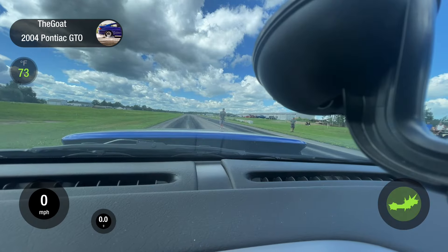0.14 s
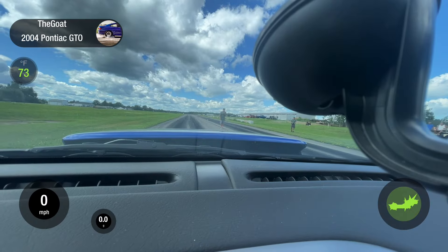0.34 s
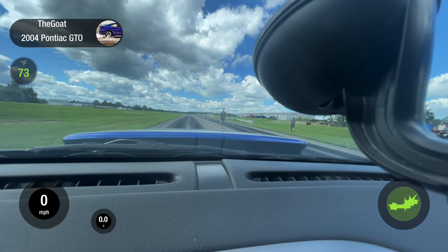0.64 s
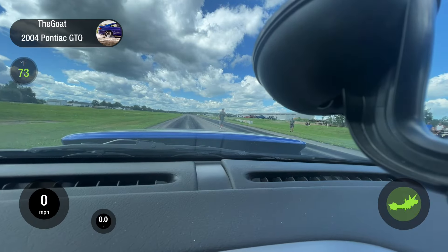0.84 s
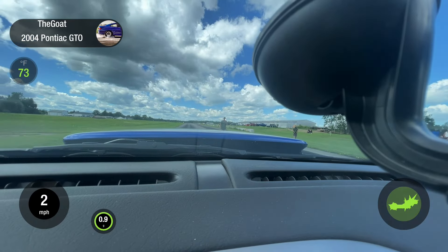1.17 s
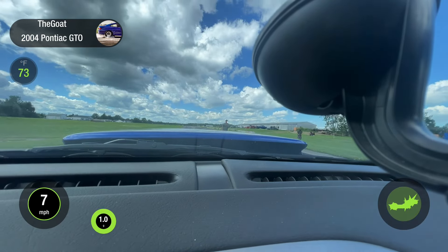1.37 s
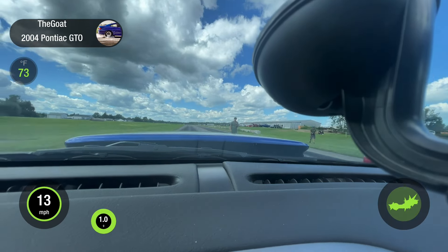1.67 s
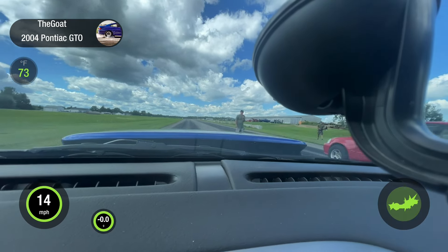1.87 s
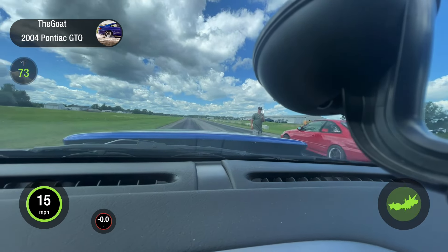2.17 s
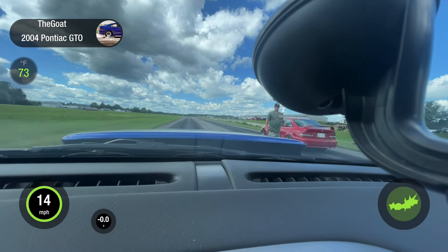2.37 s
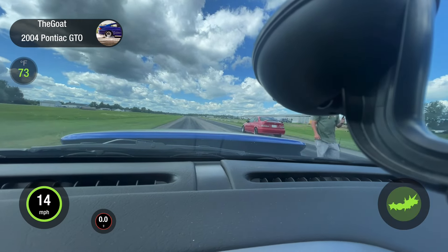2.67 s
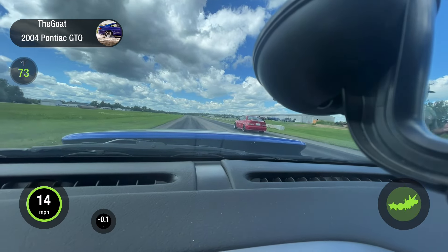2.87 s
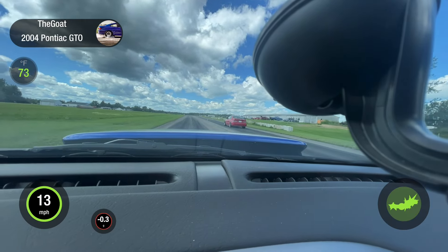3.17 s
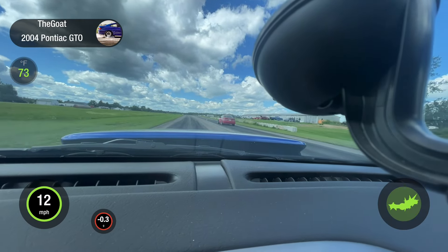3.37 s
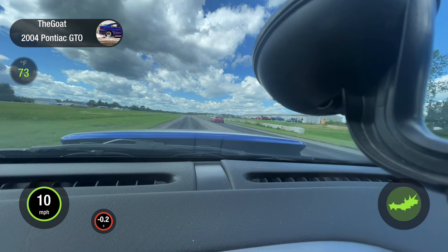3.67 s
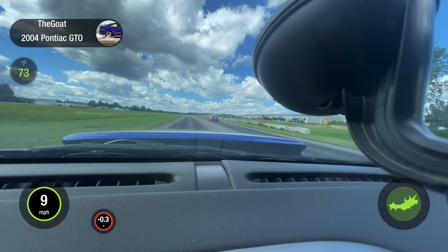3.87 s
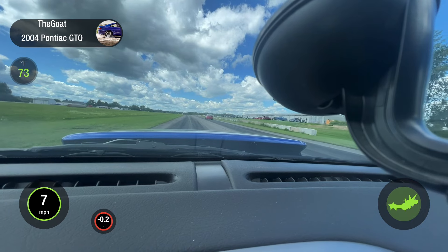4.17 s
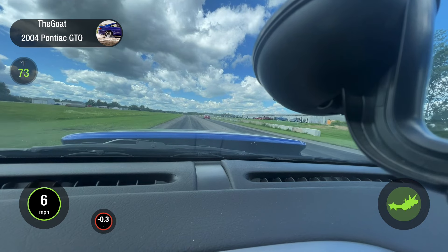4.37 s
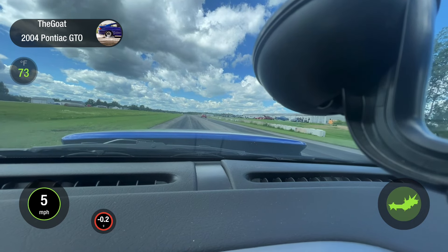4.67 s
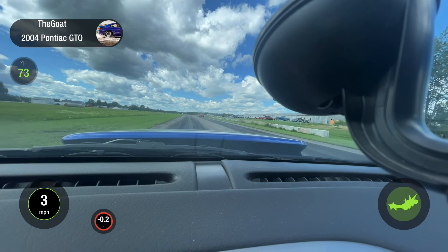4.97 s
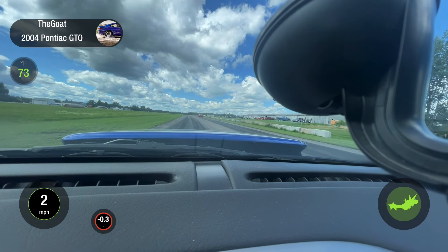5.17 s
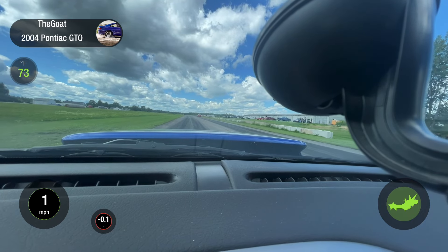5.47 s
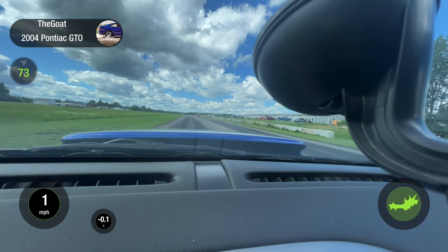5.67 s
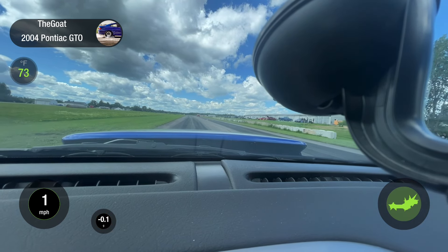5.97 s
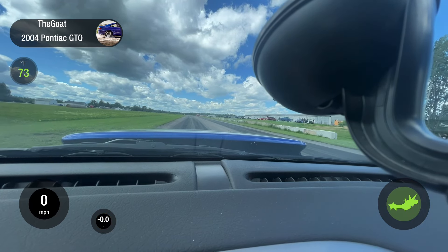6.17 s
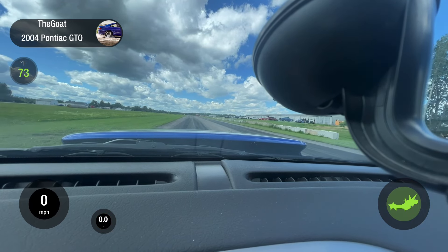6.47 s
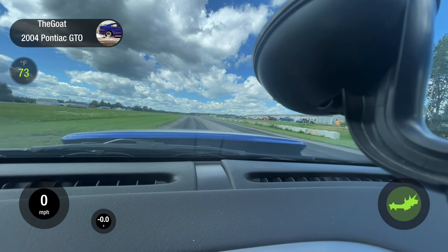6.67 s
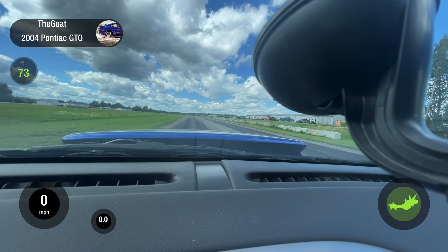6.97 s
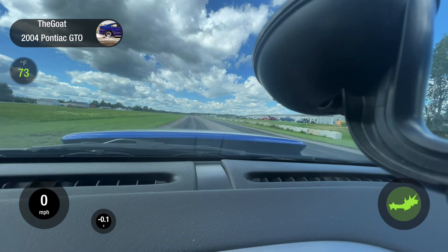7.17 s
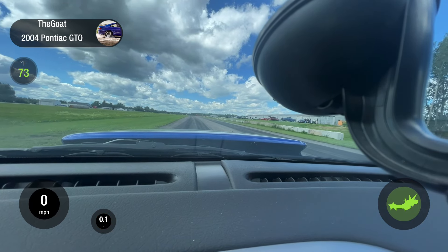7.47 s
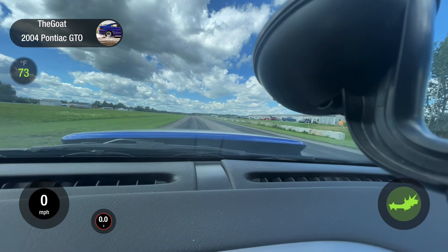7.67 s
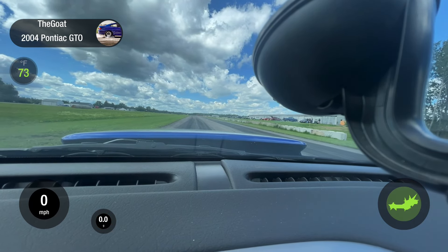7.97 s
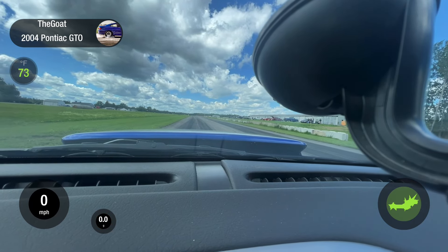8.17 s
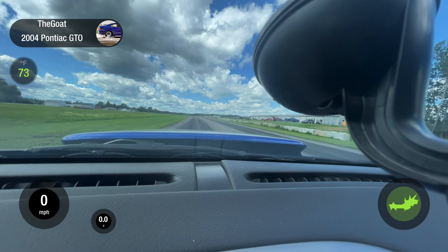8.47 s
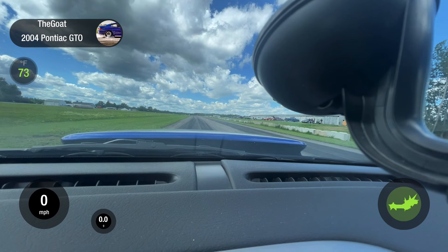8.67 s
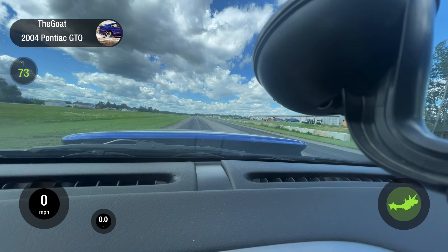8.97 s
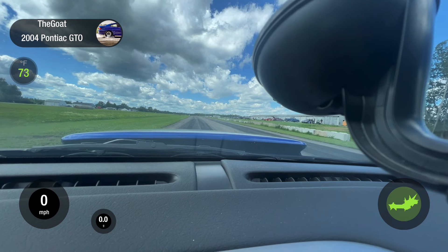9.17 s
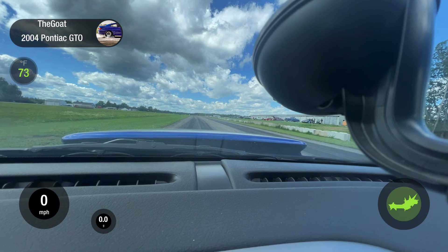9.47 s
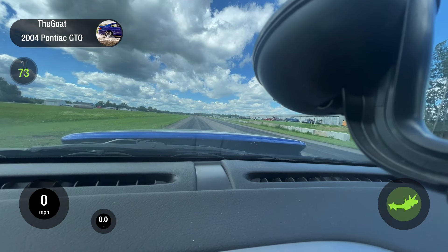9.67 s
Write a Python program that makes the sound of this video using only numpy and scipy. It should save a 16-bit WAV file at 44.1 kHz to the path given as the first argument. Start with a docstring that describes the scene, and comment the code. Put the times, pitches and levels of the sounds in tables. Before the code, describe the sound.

Heard from the dashboard of a muscle car: a lumpy supercharged V8 holds revs while its exhaust pops and crackles. It launches in a short, loud, rising roar with dash rattle, as another car pulls away. The throttle lifts, pitch slides down to a quiet idle, then the engine is revved and held softly with faint blower whine. Lever and latch clicks close it.

```python
"""A supercharged V8 heard from its own cabin, one microphone on the dashboard: it holds its revs while the exhaust
pops, is launched, lifted off, coasts to idle, then is revved and held. Sines follow its firings, noise its gas flow.
The blower whines at a fixed multiple of the firing rate and the dash buzzes more with flow and revs.
Another car pulls away as rising tones with rasp; at the end a hand works a lever and a latch, bursts of ringing
noise. A thin whistle of two fuzzy lines lies under the start. No source is delayed for its distance."""
import sys
import numpy as np
from scipy import signal
from scipy.fft import rfft, irfft, next_fast_len
from scipy.io import wavfile
from scipy.ndimage import uniform_filter1d, minimum_filter1d, map_coordinates

SR = 44100
rng = np.random.default_rng(int(sys.argv[2]) if len(sys.argv) > 2 else 0)


def makeup_ratio(level_db):
    """Linear amplitude ratio for a level in decibels (20 dB per factor of ten)."""
    decades = np.asarray(level_db, float) / 20
    return 10 ** decades


def store_pcm(level_fs):
    """Save levels as 16-bit WAV."""
    pcm = np.round(np.clip(level_fs, -1, 1) * 32767).astype(np.int16)
    wavfile.write(sys.argv[1], SR, np.atleast_2d(pcm).T)


N = 433503


# The engine's state, before flywheel smoothing and resonances:
# (time [s], firing rate [Hz], firing tone [dB], misfire half orders [dB], blower whine [dB])
ENGINE_STATE = [(0, 106.2, -14, -19, -57), (.7, 101.2, -10, -16, -53), (.85, 119.4, -10, -21, -48),
                (.98, 149.3, -7.5, -38, -64), (1.15, 148.3, -9.5, -48, -58), (1.4, 181.9, -1.5, -33, -49),
                (1.56, 216.6, -9, -27, -45.5), (1.65, 238.5, -24, -8, -54), (1.72, 268.3, -49, -34, -52),
                (1.9, 319.4, -36, -21.5, -45), (2.03, 369.7, -36, -21.5, -61),
                (2.25, 328.7, -18.5, -20, -56), (2.45, 294.3, -24.5, -28.5, -59),
                (2.9, 231.3, -26.5, -24, -59.5), (3.33, 170.6, -23, -31.5, -63.5),
                (3.6, 144, -24.5, -27, -60), (3.86, 121.8, -16.5, -35.5, -60.5),
                (4.36, 100.8, -24.5, -35, -59), (4.75, 93.16, -18.5, -37.5, -60.5),
                (5.62, 90.15, -16.5, -24.5, -59), (5.73, 111.4, -11.5, -30, -67),
                (5.83, 142.9, -11, -21, -53), (5.91, 161.9, -16, -31, -46), (5.99, 167, -13, -26.5, -53.5),
                (6.3, 146.2, -32, -17, -50.5), (6.45, 138.5, -13.5, -24, -52.5),
                (7.15, 160.2, -16, -19.5, -49.5), (7.6, 152.5, -15.5, -23.5, -48.5),
                (7.94, 165.2, -15.5, -21.5, -46), (8.25, 144.1, -25, -15.5, -48.5),
                (8.4, 132.5, -11, -20, -55.5), (8.85, 109.3, -18, -24.5, -51.5),
                (9.2, 89.57, -18.5, -24, -50), (9.83, 80.36, -18.5, -24, -58)]
# Gas flow that drives the noises: (time [s], exhaust flow [relative dB], intake flow [relative dB])
GAS_FLOW = [(0, -25.5, -49.5), (.75, -25, -45.5), (.98, -17.5, -37.5), (1.45, -18, -40), (1.6, -11.5, -37),
            (1.7, -26, -41.5), (1.72, -26, -48), (1.77, -31, -52), (1.785, -12.5, -33.5), (1.9, -14, -35),
            (1.94, -25.5, -49.5), (2.3, -28, -48), (3.04, -36, -53.5), (3.3, -40.5, -60),
            (4.2, -44.5, -61.5), (5.66, -43, -59.5), (5.71, -35.5, -51.5), (5.86, -31.5, -49.5),
            (5.92, -35, -54.5), (6.54, -38, -55), (6.92, -34, -53), (8.27, -31.5, -52),
            (8.84, -37.5, -54.5), (9.83, -38, -54)]


def engine():
    """One crank drives it all: eight firings per engine cycle, gas noise, rattling dash and blower."""
    firing_hz, burn_db, misfire_db, whine_db = curves(ENGINE_STATE)
    exhaust_db, intake_db = curves(GAS_FLOW)
    flywheel_s = .09  # the crank's inertia rounds off changes of speed
    firing_hz = uniform_filter1d(firing_hz, round(flywheel_s * SR), mode="nearest")
    firing = 2 * np.pi * np.cumsum(firing_hz) / SR  # phase [rad]
    tones = firing_tones(firing, firing_hz, burn_db, exhaust_db)
    tones += uneven_cylinders(firing, firing_hz, burn_db, misfire_db)
    exhaust = roar(firing, firing_hz, exhaust_db) + rumble(exhaust_db)
    intake = hiss(firing, intake_db) + throttle_jet(firing_hz, intake_db)
    return tones + exhaust + intake + dash_buzz(firing_hz, exhaust_db) + whine(firing, firing_hz, whine_db)


# Pipe modes that pass the octave of the firing tone:
# (centre [Hz], half width [Hz], level over the firing tone at -26.5 dB exhaust flow [dB])
OCTAVE_MODES = [(183, 32, -10), (295.3, 15.2, -8.5), (325, 5.5, -14), (437, 24.7, -13), (493, 35, -9.5),
                (700, 340, -18)]


def firing_tones(firing, firing_hz, burn_db, exhaust_db):
    """The firing rate and its octave and third partial, each let through by cabin or pipe resonances."""
    null_hz, null_width_hz = 207, 13.2  # the cabin swallows the firing tone here
    null = 1 - 1 / (1 + ((firing_hz - null_hz) / null_width_hz) ** 2)
    first = null * tone(firing, burn_db, waver_db=2.0, drift=0.64, rate=14)

    passed = sum(makeup_ratio(db) / (1 + ((2 * firing_hz - hz) / width) ** 4) for hz, width, db in OCTAVE_MODES)
    octave_db = burn_db + 0.37 * (exhaust_db + 26.5)  # 0.37 dB more per dB of flow
    octave = passed * tone(2 * firing, octave_db, waver_db=5.0, drift=0.64, rate=12)

    tailpipe = 1 / (1 + ((3 * firing_hz - 480) / 55) ** 4)  # the third partial sounds only near 480 Hz
    third = tailpipe * tone(3 * firing, 2 * exhaust_db + 18, waver_db=2.5, drift=0.58, rate=5.5)
    return first + octave + third


def uneven_cylinders(firing, firing_hz, burn_db, misfire_db):
    """Unequal cylinders sound the even (crank) and odd (misfire) multiples of the engine cycle."""
    cycle, cycle_hz = firing / 8, firing_hz / 8
    full_load_db = -14.5  # firing tone above which the cylinders even out and crank orders fade
    crank_db = -14.5 + 0.29 * misfire_db - 1.3 * np.maximum(burn_db - full_load_db, 0)
    crank = orders(cycle, cycle_hz, crank_db, waver_db=2.5, drift=0.25, rate=8,
                   order=[2, 4, 6, 10, 12, 14, 18, 20])
    misfire = orders(cycle, cycle_hz, misfire_db, waver_db=3.5, drift=1.3, rate=12, order=range(1, 21, 2))
    return crank + misfire


def orders(cycle, cycle_hz, db, waver_db, drift, rate, order):
    """Multiples of the engine cycle, with the level shared out among them by the cabin boom."""
    shares = np.array([along(CABIN_BOOM, k * cycle_hz) / (1 + (55 / (k * cycle_hz)) ** 4) for k in order])
    shares /= np.sqrt(np.sum(shares ** 2, axis=0))
    return sum(share * tone(k * cycle, db, waver_db, drift, rate) for k, share in zip(order, shares))


# Exhaust roar, also the colour of the other car's rasp: (frequency [Hz], gain before levelling [dB])
ROAR_COLOUR = [(140, -12.5), (230, -6), (252, -10.5), (322, -5.5), (567, -17), (733, -17.5), (1230, -25),
               (1470, -28.5), (3530, -38.5), (5000, -68), (6500, -82.5), (11000, -120)]


def roar(firing, firing_hz, exhaust_db):
    """Gas turbulence follows each blowdown; single firings stand out of it more as their rate rises."""
    puffs = makeup_ratio(0.37 * np.cos(firing) + 1.7 * np.cos(firing / 4) + 1.1 * wobble(30))
    turbulence = puffs * rng.standard_normal(N)
    clean = np.minimum(firing_hz / 260, .75)  # weight of the single firings
    shots = firings(firing + .17 * wobble(40), uneven=1.3, scatter_db=2)
    return makeup_ratio(exhaust_db + 3.5) * rush(ROAR_COLOUR, turbulence + clean * shots)


# Strength of each cylinder in firing order, later scaled by "uneven": (level [dB])
CYLINDER_LEVELS = [0, -6, 3, -2, 2, -7, 4, -3]


def firings(phase, uneven, scatter_db):
    """One click per firing, sized by its cylinder and by chance, levelled to a running rms of 1."""
    count = np.floor(phase / (2 * np.pi)).astype(int)
    at = np.flatnonzero(np.diff(count)) + 1
    cylinder_db = np.take(CYLINDER_LEVELS, count[at] % len(CYLINDER_LEVELS))
    out = np.zeros(N)
    out[at] = makeup_ratio(uneven * cylinder_db + scatter_db * rng.standard_normal(len(at)))
    return out / np.sqrt(uniform_filter1d(out ** 2, SR // 10) + 1e-9)


# Low boom of the cabin, shaping rumble and engine orders: (frequency [Hz], gain before levelling [dB])
CABIN_BOOM = [(20, -0.5), (40, -0.5), (60, 9), (90, 8), (140, 6), (190, 5), (225, -22.5), (300, -14),
              (450, -15.5), (700, -48)]


def rumble(exhaust_db):
    """Low noise in the cabin that grows 0.62 dB per dB of exhaust flow."""
    return makeup_ratio(-9.5 + 0.62 * exhaust_db) * rush(CABIN_BOOM, rng.standard_normal(N))


# Intake hiss: (frequency [Hz], gain before levelling [dB])
HISS_COLOUR = [(1760, -11), (3000, -1.5), (4620, -5), (5460, -9), (7210, -9.5), (9500, -14), (11000, -31),
               (14000, -32)]


def hiss(firing, intake_db):
    """Intake air noise that swells slightly with each firing and flickers at random."""
    pulsed = makeup_ratio(0.74 * np.cos(firing)) * rng.standard_normal(N)
    return makeup_ratio(intake_db + 0.94 * wobble(27)) * rush(HISS_COLOUR, pulsed)


# Throttle-plate hiss: (frequency [Hz], gain before levelling [dB])
JET_COLOUR = [(6000, -22), (9000, -7), (11000, -5.5), (13300, 1.5), (14500, -11)]


def throttle_jet(firing_hz, intake_db):
    """The top of the hiss grows faster than the rest as the throttle opens, and with revs."""
    revs_db = 2.5 * np.log2(firing_hz / 150)  # 2.5 dB per octave of revs
    return makeup_ratio(1.414 * intake_db + 5.5 + revs_db) * rush(JET_COLOUR, rng.standard_normal(N))


# Rattling dash panels: (frequency [Hz], gain before levelling [dB])
BUZZ_COLOUR = [(1200, -30), (1500, -9), (1580, 0.5), (1680, 0.5), (1780, -7.5), (2200, -21), (3200, -35.5)]


def dash_buzz(firing_hz, exhaust_db):
    """Dash panels rattle as a narrow noise, 1.19 dB up per dB of flow and 2.5 dB per octave of revs."""
    level_db = -15.5 + 1.19 * exhaust_db + 2.5 * np.log2(firing_hz / 150)
    return makeup_ratio(level_db + 1.9 * wobble(20)) * rush(BUZZ_COLOUR, rng.standard_normal(N))


# Octave of the blower whine: (frequency of the octave [Hz], level over the whine [dB])
WHINE_OCTAVE = [(3600, -23.5), (4250, -12.5), (4650, -9), (5050, -10), (6400, -17), (7200, -22.5),
                (12000, -17)]


def whine(firing, firing_hz, whine_db):
    """Rotor lobes sing lines that spread into sidebands as the crank's speed ripples per turn and cycle."""
    lobes_per_firing = 22.5
    lobes = lobes_per_firing * firing + .9 * np.sin(firing / 4) + .7 * np.sin(firing / 8)
    lobe_hz = lobes_per_firing * firing_hz
    octave_db = whine_db + 20 * np.log10(along(WHINE_OCTAVE, 2 * lobe_hz))
    out = np.zeros(N)
    for k, db in zip((1, 2, 3), (whine_db, octave_db, octave_db - 11)):
        firewall = 1 / (1 + (k * lobe_hz / 11500) ** 12 + (2150 / (k * lobe_hz)) ** 8)  # a band passes
        out += firewall * tone(k * lobes, db + 3 * wobble(11), waver_db=4.5,
                               drift=k * np.sqrt(firing_hz / 160), rate=120)
    return out


# Unburnt fuel popping in the exhaust, before cabin and pipe:
# (time [s], relative level [dB], 60 dB decay of the burst [s])
EXHAUST_POPS = [(0.004, -11.5, 0.079), (0.09, -16, 0.33), (0.228, -12, 0.33), (0.349, -17, 0.25),
                (0.464, -7, 0.17), (0.539, -21, 0.61), (0.661, -10, 0.14), (0.774, -20, 0.69),
                (0.935, -25, 0.14), (1.611, -6.5, 0.19), (3.489, -21.5, 0.17), (6.302, -34, 0.2)]
# Body of a pop: (frequency [Hz], gain [dB])
BANG_COLOUR = [(40, -12.5), (90, 17), (250, 4), (500, 1.5), (1500, -10.5), (4000, -18), (9000, -33.5),
               (14000, -39)]
# Leading edge of a pop: (frequency [Hz], gain [dB])
CRACK_COLOUR = [(300, -32), (1000, -6), (2500, -4.5), (5000, -29), (9000, -3), (14000, -18)]


def pops():
    """Each pop is a burst of noise that rings the cabin and, longer, the tailpipe, over a body thump."""
    bang, thump, snap = np.zeros((3, N + SR))
    t = np.arange(SR // 2) / SR
    for s, db, t60 in EXHAUST_POPS:
        span = slice(round(s * SR), round(s * SR) + len(t))
        decay = makeup_ratio(db - 60 * t / max(t60, .02))
        bang[span] += decay * (1 + 0.31 * makeup_ratio(-60 * t / 0.017)) * (1 - np.exp(-t / 0.00061))
        snap[span] += makeup_ratio(db - 60 * t / 0.037)
        thump[span] += makeup_ratio(db - 6.0 - 60 * t / 0.23) * np.sin(2 * np.pi * 72 * t)  # the body shell booms

    def crack_path(hz):
        """The sharp edge rings the cabin alone."""
        return along(CRACK_COLOUR, hz) * cabin(hz)

    def bang_path(hz):
        """The bang rings a narrow tailpipe mode as well as the cabin."""
        return along(BANG_COLOUR, hz) * cabin(hz) * (1 + makeup_ratio(8.5) * mode(hz, 425, 14))

    crackle = makeup_ratio(-13.5) * filtered(snap[:N] * rng.standard_normal(N), crack_path)
    body = makeup_ratio(9.5) * filtered(bang[:N] * rng.standard_normal(N), bang_path)
    return thump[:N] + crackle + body


# The other car's pulls on its throttle:
# (start [s], length [s], firing rate from [Hz], firing rate to [Hz], mean firing tone [dB])
RIVAL_PULLS = [(1.654, 0.065, 297, 318.5, -17), (1.788, .06, 325, 344.4, -6),
               (1.862, .075, 392.3, 416.7, -11), (3.55, .6, 216, 246.7, -41),
               (4.246, 0.46, 253.7, 254.1, -42), (5.051, 0.54, 343, 370.9, -48)]


def rival():
    """The other car's firing tone climbs through each pull, with the rasp of its single firings."""
    rows = []
    for start, length, low_hz, high_hz, db in RIVAL_PULLS:
        end, edge, faint_db = start + length, .08 * length, db - 30  # fades before and after the pull
        rows += [(start - edge - .005, low_hz, -120), (start - edge, low_hz, faint_db), (start, low_hz, db),
                 (end, high_hz, db), (end + edge, high_hz, faint_db), (end + edge + .005, high_hz, -120)]
    hz, level_db = curves(rows)
    phase = 2 * np.pi * np.cumsum(hz) / SR
    rasp = makeup_ratio(level_db - 3) * rush(ROAR_COLOUR, firings(phase, uneven=.5, scatter_db=1.5))
    return tone(phase, level_db, waver_db=3, drift=0.25, rate=18) + rasp


# Lever and latch contacts in the cabin, before ringing:
# (time [s], relative level [dB], tilt about 6 kHz [dB per octave], 60 dB decay of the crack [s])
CONTACTS = [(8.458, -25.5, -4, 0.075), (9.228, -22.5, -5, 0.056), (9.258, -11, -1.5, .077),
            (9.389, -38.5, 6.5, .06), (9.408, -29.5, 6.5, 0.051), (9.422, -23, -6, 0.12),
            (9.69, -26.5, 4, 0.099), (9.732, -13.5, 0, .062), (9.742, -14, -8, 0.11),
            (9.767, -27.5, 3.5, 0.09), (9.793, -22, -1.5, 0.096)]
# Modes of the lever and latch: (centre [Hz], width [Hz], mean level over the direct crack [dB])
LATCH_MODES = [(3330, 340, 8), (5220, 130, 6), (5996, 200, 5), (6700, 100, 5.5), (8550, 300, 6),
               (11400, 89, -1.5), (13000, 300, 3)]


def clicks():
    """Plastic and metal contacts: a wide crack that rings the same modes, each anew."""
    out, t = np.zeros(N + SR), np.arange(SR // 4) / SR
    hz = np.fft.rfftfreq(len(t), 1 / SR)
    for s, db, tilt_db, t60 in CONTACTS:
        ring = 1 + sum(makeup_ratio(level + rng.normal(0, 2.3)) * mode(hz, c, w) for c, w, level in LATCH_MODES)
        tilt = makeup_ratio(tilt_db * np.log2(np.clip(hz, 1500, 14000) / 6000))
        colour = tilt * hz ** 2 / (hz ** 2 + 2000 ** 2)  # little below 2 kHz
        envelope = makeup_ratio(db - 12 - 60 * t / max(t60, .01)) * (1 - np.exp(-t / 0.0029))
        crack = envelope * rng.standard_normal(len(t))
        out[round(s * SR):][:len(t)] += irfft(rfft(crack) * colour * ring, len(t))
    return out[:N]


def whistle():
    """A thin, fuzzy line and its octave, blurred by fast phase wander, that stop at the launch."""
    t = np.arange(N) / SR
    phase = 2 * np.pi * 4620 * t
    low = tone(phase, -54, waver_db=3, drift=1.5, rate=120)
    high = tone(2 * phase, -63, waver_db=4, drift=2.5, rate=120)
    return (low + high) * np.clip((.85 - t) / .05, 0, 1)  # silent from 0.85 s


# Cabin panels and air modes: (centre [Hz], width [Hz], boost [dB])
CABIN_MODES = [(274, 110, 5), (422.4, 32, 8), (512, 28, 8), (691, 4.4, 10), (734.7, 31, 7.5), (878, 20, 5),
               (968, 37, 5.5), (1065, 16, 7), (1214, 25, 6.5), (1366, 8.7, 6.5), (1617, 6.5, 8.5),
               (1690, 8.8, 5), (2010, 27, 4), (2200, 39, 10.5), (2392, 35, 6), (2564, 23, 8.5),
               (2690, 91, 2.5), (4630, 72, 0), (7350, 250, 3)]


def cabin(hz):
    """Direct sound plus the ringing of each cabin mode."""
    return 1 + sum((makeup_ratio(db) - 1) * mode(hz, c, w) for c, w, db in CABIN_MODES)


def mode(hz, centre, width):
    """Complex response of one damped resonance, 1 at its centre."""
    return 1j * hz * width / (centre ** 2 - hz ** 2 + 1j * hz * width)


def rush(spectrum, source):
    """A source coloured by its path and the cabin, rms 1."""
    x = filtered(source, lambda hz: along(spectrum, hz) * cabin(hz))
    return x / np.std(x)


def tone(phase, db, waver_db, drift, rate):
    """A sine about rms level db; size (waver_db) and phase (drift [rad]) wander at rate knots a second."""
    size = np.sqrt(2) * makeup_ratio(db + waver_db * wobble(rate))
    return size * np.sin(phase + drift * wobble(rate) + rng.uniform(0, 2 * np.pi))


def wobble(rate):
    """A random curve of straight segments, rate knots a second."""
    knots = rng.standard_normal(int(N * rate / SR) + 4)
    return map_coordinates(knots, [np.arange(N) * rate / SR], order=1)


def along(points, hz):
    """(Hz, dB) points joined on a log frequency axis, as gain."""
    f, db = np.transpose(points)
    return makeup_ratio(np.interp(np.log(hz + 1), np.log(f + 1), db))


def curves(rows):
    """One value per sample for each column after the time."""
    s, *columns = np.transpose(rows)
    return [np.interp(np.arange(N) / SR, s, column) for column in columns]


def filtered(x, response):
    """x passed through a complex response of frequency, padded so that ringing does not wrap."""
    m = next_fast_len(N + SR // 2)
    return irfft(rfft(x, m) * response(np.fft.rfftfreq(m, 1 / SR)), m)[:N]


def scene():
    """Everything reaches one microphone on the dashboard."""
    return (engine() + pops() + rival() + clicks() + whistle())[None]


def roll_off(x):
    """The treble ends steeply here."""
    return signal.sosfilt(signal.butter(12, 15130, fs=SR, output="sos"), x)


def record(dry):
    """A look-ahead limiter turns the gain down around the loudest peaks; then a low-pass at 14 kHz."""
    ceiling, hold = .66, round(.003 * SR)
    needed = np.minimum(1, ceiling / (np.abs(dry[0]) + 1e-9))
    gain = uniform_filter1d(minimum_filter1d(needed, 2 * hold), hold)
    mix = filtered(gain * dry[0], lambda hz: hz < 14000)[None]
    return roll_off(mix)


dry = scene()
out = record(dry)
store_pcm(out)
```